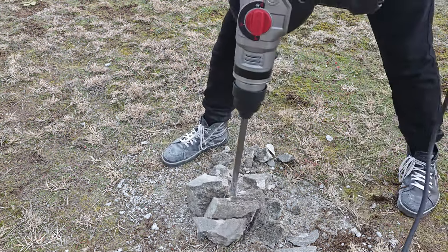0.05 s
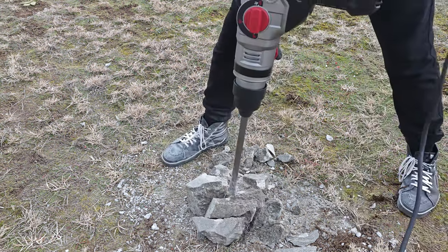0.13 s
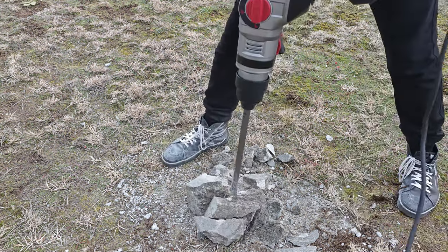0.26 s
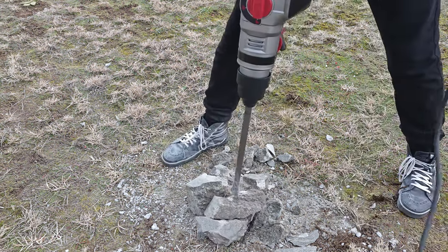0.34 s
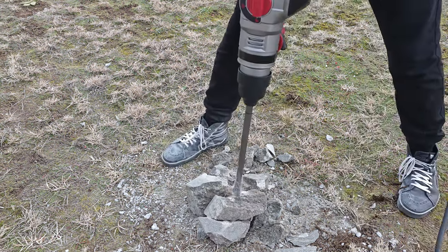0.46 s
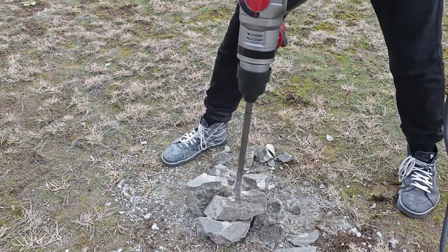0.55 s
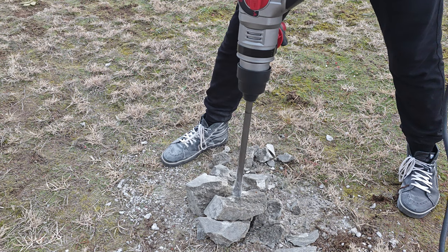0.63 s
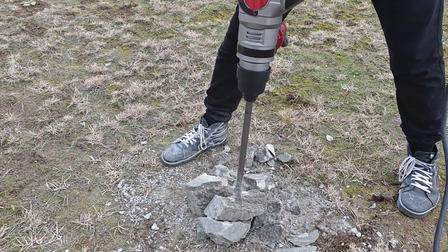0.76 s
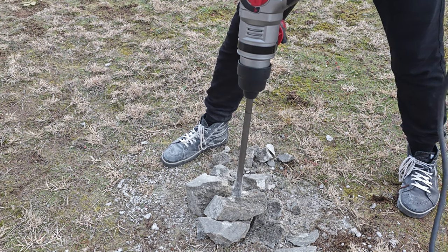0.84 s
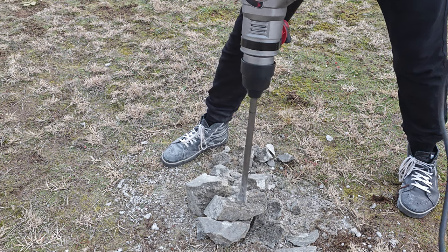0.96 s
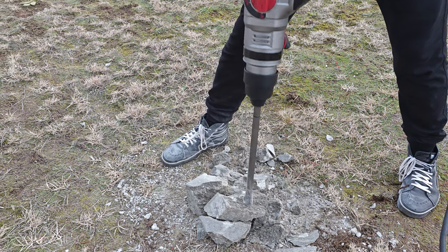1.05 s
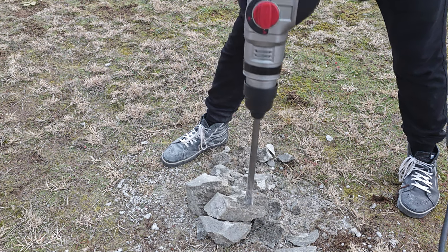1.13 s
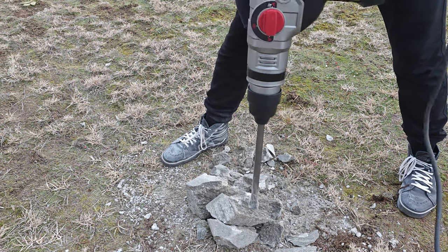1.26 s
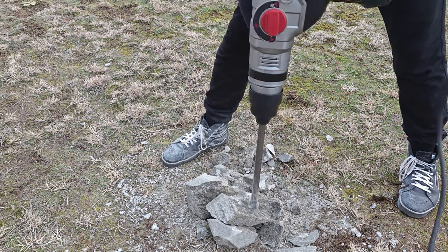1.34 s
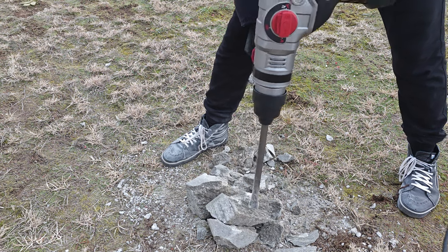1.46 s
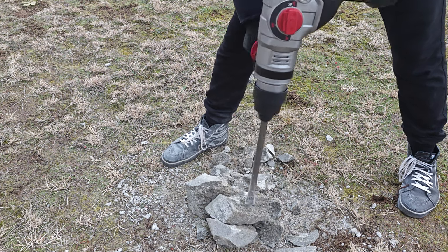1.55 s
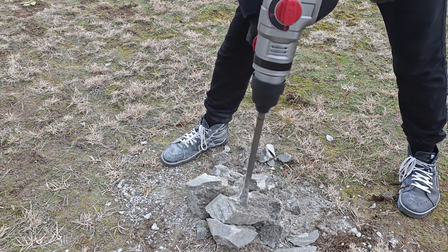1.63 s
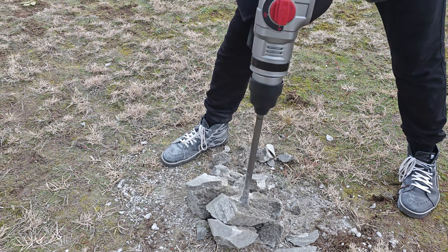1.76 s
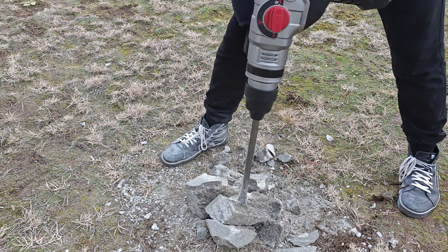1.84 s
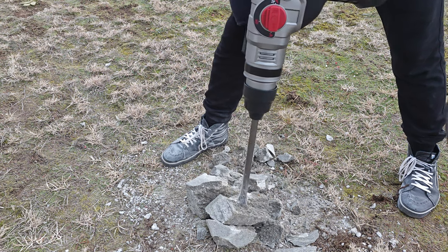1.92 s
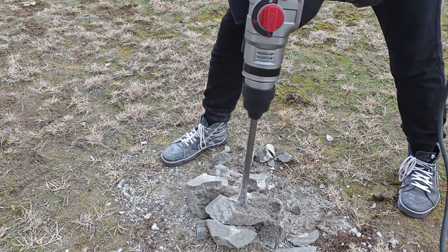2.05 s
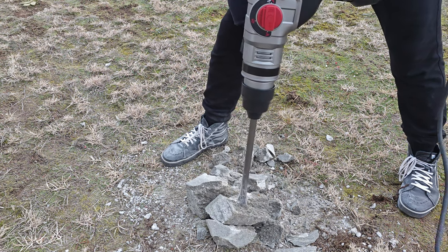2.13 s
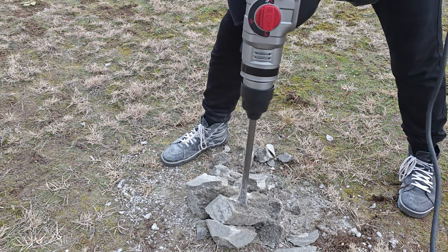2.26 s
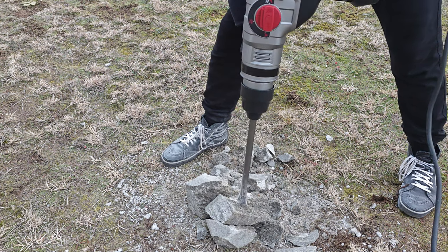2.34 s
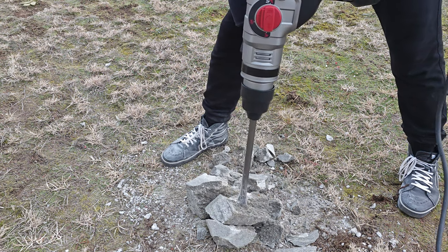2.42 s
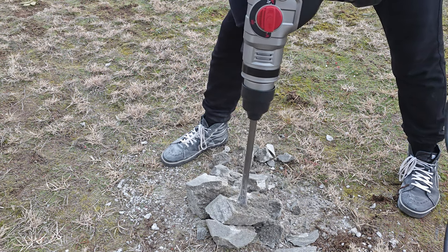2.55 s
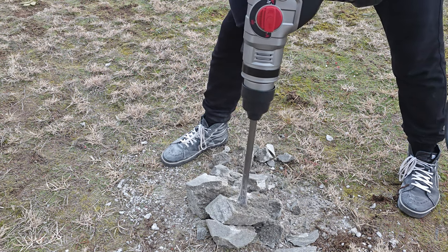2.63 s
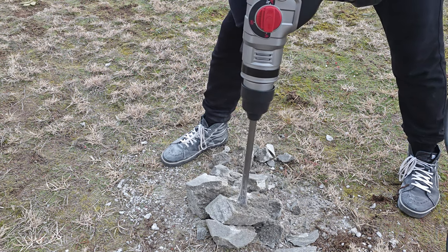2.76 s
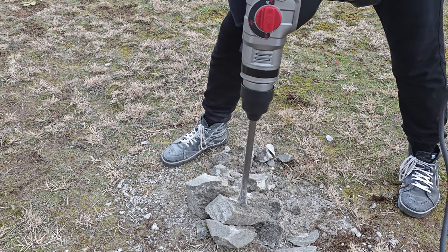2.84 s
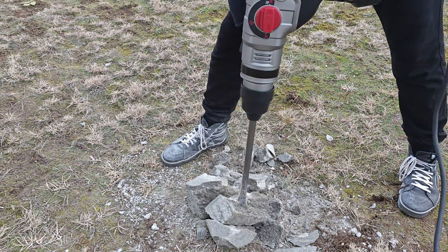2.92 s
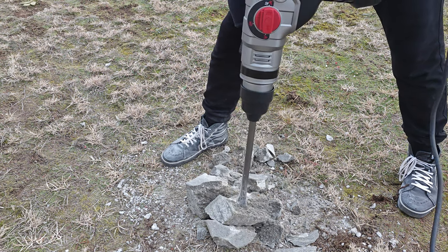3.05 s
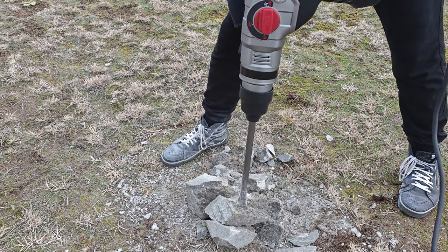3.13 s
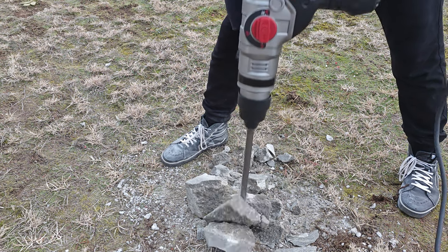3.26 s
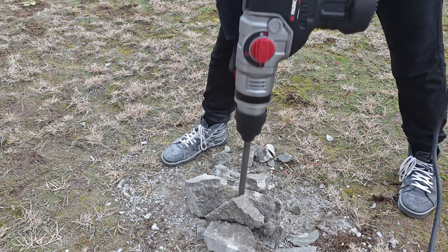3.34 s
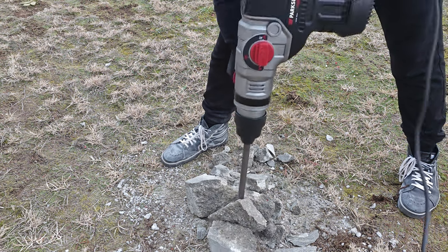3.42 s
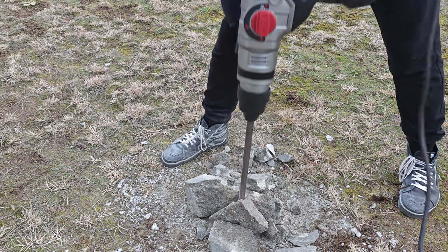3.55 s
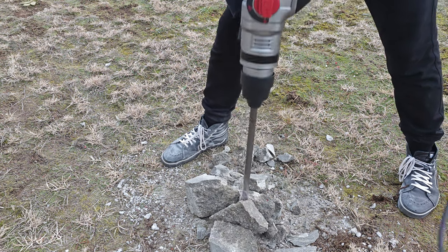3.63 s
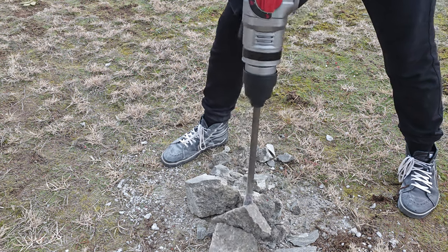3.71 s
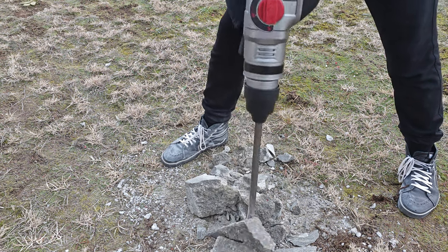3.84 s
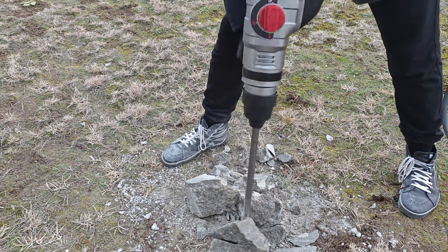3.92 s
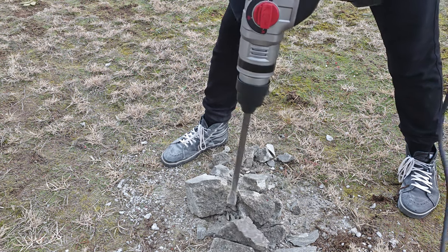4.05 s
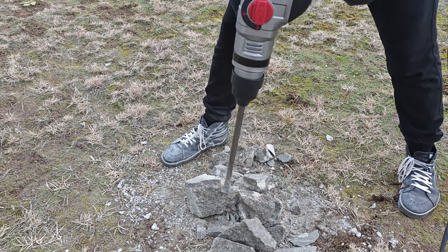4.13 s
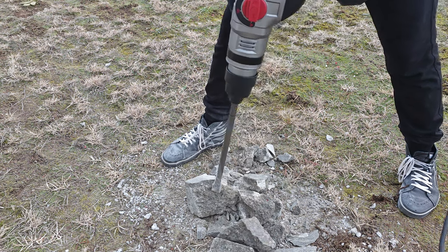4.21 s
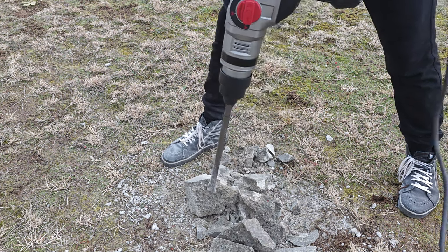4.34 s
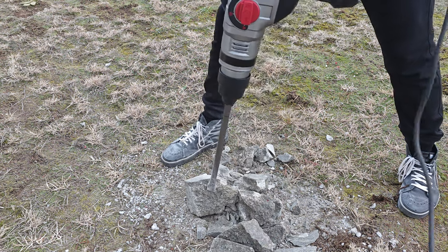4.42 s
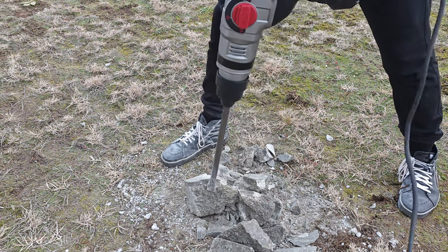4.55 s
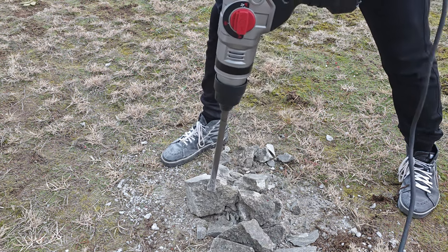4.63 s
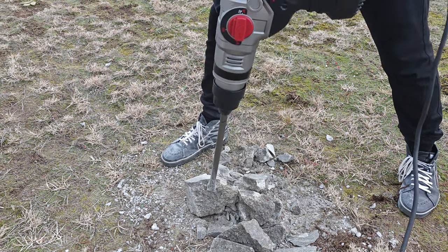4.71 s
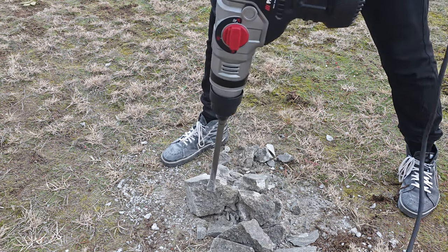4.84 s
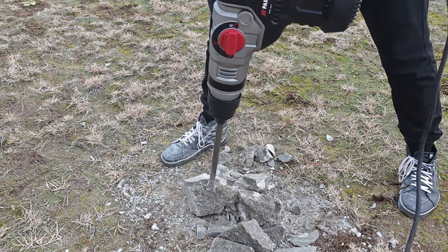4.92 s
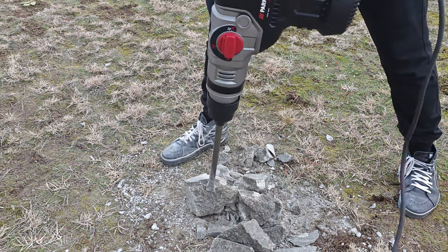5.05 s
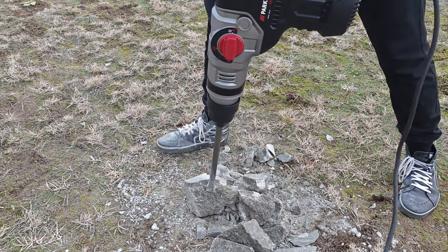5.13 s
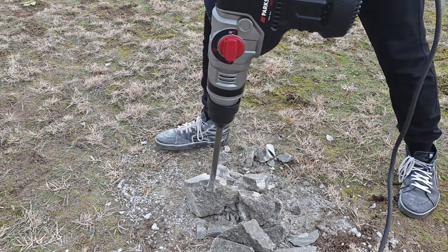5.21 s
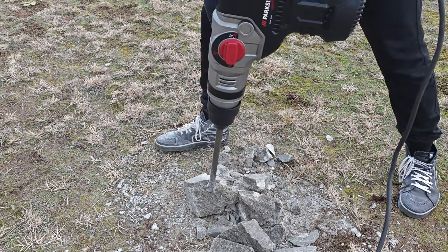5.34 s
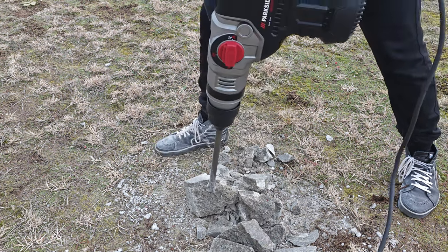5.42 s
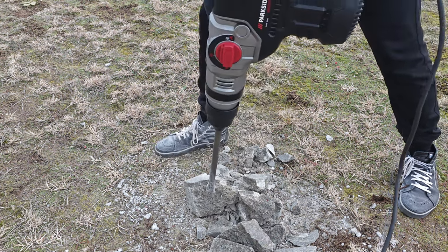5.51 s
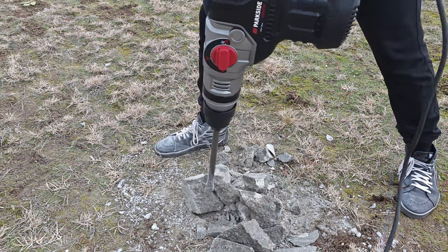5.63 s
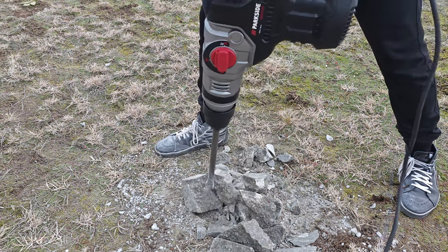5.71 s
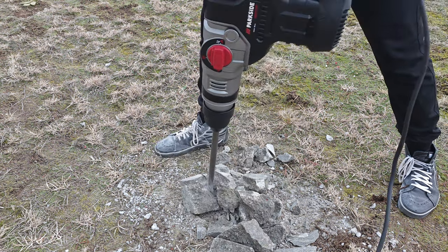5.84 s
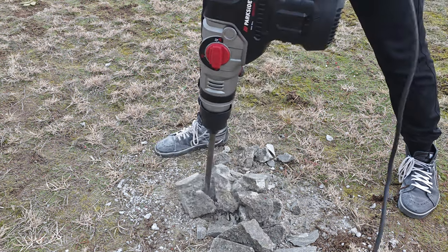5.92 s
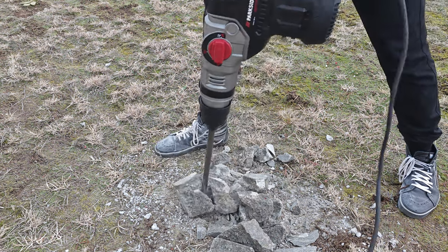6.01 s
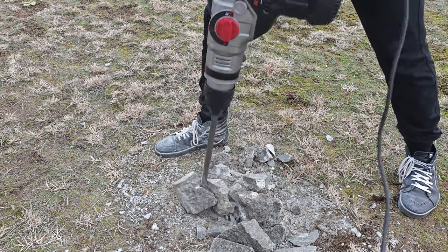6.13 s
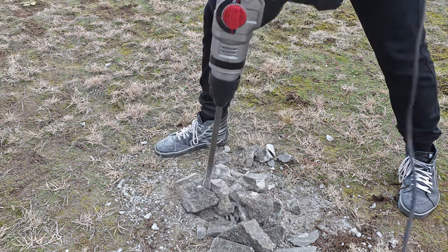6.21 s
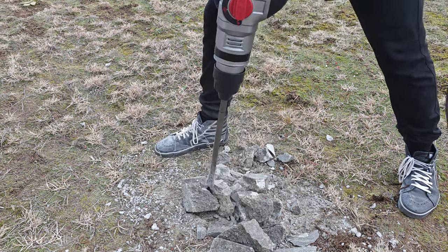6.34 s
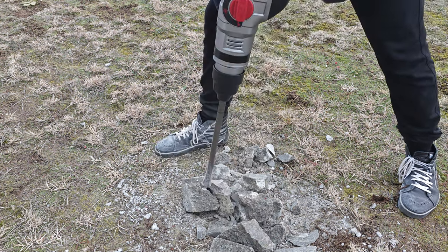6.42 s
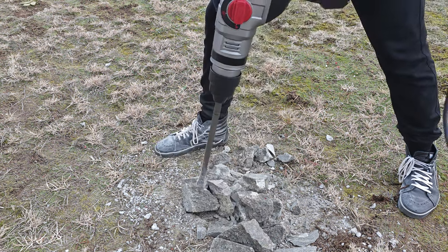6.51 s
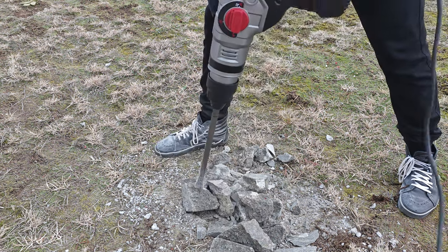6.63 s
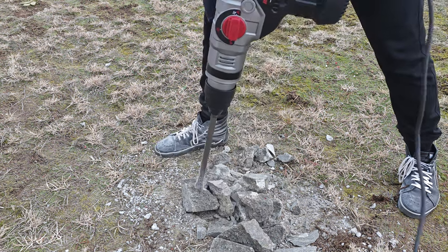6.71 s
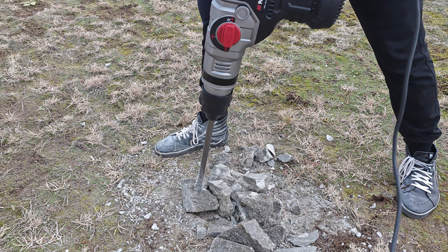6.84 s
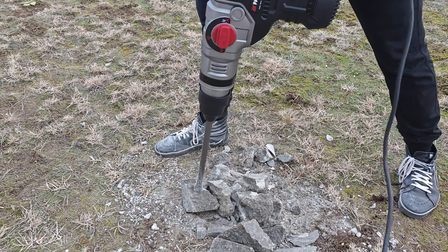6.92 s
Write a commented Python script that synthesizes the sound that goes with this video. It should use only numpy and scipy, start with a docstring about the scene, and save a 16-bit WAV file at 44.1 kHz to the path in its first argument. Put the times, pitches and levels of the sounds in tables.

```python
"""Broken concrete and a steel chisel knock together over light wind; then a hammer drill winds up twice.
Each knock is a damped resonance of stone, and the jogged chisel rings in its own modes.
The motor's rattle, hiss and tones all follow one shaft speed. In two runs of blows the striker
hits the bit and the steel rings; after each run the motor whirrs free.
Low microphone thumps, each mostly on one side, come during and just after the hammering."""
import sys
import numpy as np
from scipy import signal
from scipy.fft import rfft, irfft
from scipy.io import wavfile
from scipy.ndimage import uniform_filter1d

SR = 44100
rng = np.random.default_rng(int(sys.argv[2]) if len(sys.argv) > 2 else 0)


def file_out(sig):
    """Save sig as 16-bit WAV at sys.argv[1]."""
    # one column per channel
    cols = np.atleast_2d(sig).T
    # limit, then scale
    lim = np.clip(cols, -1, 1)
    pcm = np.round(lim * 32767).astype(np.int16)
    wavfile.write(sys.argv[1], SR, pcm)


N = 307377
TIME = np.arange(N) / SR
IMPACT_TIME = np.arange(SR // 4) / SR


def gain_of(db):
    """Decibels to amplitude."""
    return 10 ** (np.asarray(db) / 20)


def unit_rms(x):
    """Normalisation to rms 1."""
    return x / np.sqrt(np.mean(x ** 2) + 1e-20)


def at_hz(points, hz):
    """Interpolation of a spectrum on a log-frequency axis."""
    f, value = np.transpose(points)
    return np.interp(np.log(hz + 1), np.log(f + 1), value)


def add(mix, s, sound):
    """Superposition of a stereo sound starting at s seconds."""
    part = mix[:, round(s * SR):][:, :sound.shape[1]]
    part += sound[:, :part.shape[1]]


def wobble(span_s):
    """Random fluctuation of rms 1, smoothed over span_s."""
    size = max(round(span_s * SR), 2)
    return unit_rms(uniform_filter1d(uniform_filter1d(rng.standard_normal(N), size), size))


def resonance(modes, hz):
    """Summed response of resonators (frequency [Hz], bandwidth [Hz], level [dB])."""
    return sum(gain_of(db) / np.sqrt(1 + (2 * (hz - f) / width) ** 2) for f, width, db in modes)


def spectrum(points):
    """Amplitude response of a level table, as a function of frequency."""
    return lambda hz: gain_of(at_hz(points, hz))


# Likeness of drill and rubble at the two microphones: (frequency [Hz], correlation [-1..1])
SOURCE_COHERENCE = [(60, 0.17), (180, 0.92), (550, 1), (1650, 0.77), (4970, 0.019), (15000, 0.05)]

def noise(length, colour, coherence=SOURCE_COHERENCE):
    """Partially coherent stereo noise of rms 1, shaped by colour(hz)."""
    hz = np.fft.rfftfreq(length, 1 / SR)
    left, independent = rfft(rng.standard_normal((2, length)))
    shared = np.clip(at_hz(coherence, hz), -1, 1)
    right = shared * left + np.sqrt(1 - shared ** 2) * independent
    return unit_rms(irfft(colour(hz) * np.array([left, right]), length))


# Wind over distant hush: (frequency [Hz], relative level [dB])
WIND_SPECTRUM = [(12, -54), (20, -9.5), (82, 3.5), (244, -10.5), (535, -15), (1510, -14.5), (4050, -41.5),
                 (7100, -67), (8650, -53.5), (15200, -49), (16500, -72)]
# Its likeness at the two microphones: (frequency [Hz], correlation [-1..1])
WIND_COHERENCE = [(60, 0.97), (380, 0.85), (2380, -0.38), (15000, 0.27)]
# Its balance: (frequency [Hz], left minus right [dB])
WIND_BALANCE = [(60, 0.5), (380, 0.5), (2380, -1), (15000, 3)]

def wind(level_db=-48.5):
    """Turbulence: low broadband noise, amplitude-modulated by light gusts."""
    hush = noise(N, spectrum(WIND_SPECTRUM), WIND_COHERENCE)
    balance_db = at_hz(WIND_BALANCE, np.fft.rfftfreq(N, 1 / SR))
    hush = irfft(rfft(hush) * gain_of([balance_db / 2, -balance_db / 2]), N)
    gusts_db = 1.5 * wobble(.03) + .5 * wobble(.3)
    return gain_of(level_db + gusts_db) * hush


# Body of the stone: (frequency [Hz], relative level [dB])
STONE_SPECTRUM = [(88, -54.5), (150, -11.5), (652, -1), (985, -0.5), (1370, -8), (1710, -2), (2720, -7.5),
                  (3040, -15.5), (3350, -8.5), (4000, -22), (5200, -62), (8800, -120)]
# Grit at the contact: (frequency [Hz], relative level [dB])
GRIT_SPECTRUM = [(1760, -35), (3000, -4), (4260, -7), (6480, -5.5), (7320, -2.5), (8500, -15.5),
                 (15100, -20.5), (16500, -35)]
# Knocks of bit and rubble: (time [s], relative level [dB], body resonance [Hz], grit re body [dB])
RUBBLE_KNOCKS = [(.012, -21.5, 581, -13), (.034, -15.5, 724, -11.5), (.093, -6, 666, -10),
                 (0.112, -12.5, 616, -26), (0.149, -12.5, 891, 0), (.156, -6, 1650, -21),
                 (.24, -24, 546, -19), (.332, -28.5, 1560, -13.5), (.73, -36, 900, -15.5),
                 (.765, -37.5, 800, -18), (1.013, -16.5, 520, -16), (1.189, -10, 1080, -8.5),
                 (1.216, -15, 1390, -18), (1.308, -10, 750, 1), (1.317, -1.5, 1780, -11),
                 (1.38, -22.5, 706, -18), (1.546, -28, 1230, -21), (1.638, -24, 1220, -21),
                 (1.659, -23, 501, -19), (1.74, -17, 930, -10), (1.772, -15, 900, -20),
                 (1.995, -5, 860, -7.5), (2.226, -40.5, 603, 10.5), (2.909, -25, 970, -33),
                 (5.141, -4, 1810, -18), (5.175, -8, 1960, -20), (5.302, -9, 890, -19),
                 (5.458, -26, 877, 5)]

def knocks(t60_s=0.047):
    """Impact excitation: stone answers with a gritty burst around a heavily damped resonance."""
    out, t = np.zeros((2, N)), IMPACT_TIME
    fall_db = -60 * t / t60_s
    scatter = 0.059 * gain_of(-60 * t / 0.25)  # off the rubble and ground
    for s, db, body_hz, grit_db in RUBBLE_KNOCKS:
        stone = lambda hz: spectrum(STONE_SPECTRUM)(hz) * (1 + 2.54 * resonance([(body_hz, 180, 0)], hz))
        body = noise(len(t), stone) * (gain_of(fall_db) + scatter) * np.minimum(t / 0.0018, 1)
        grit = noise(len(t), spectrum(GRIT_SPECTRUM)) * (gain_of(1.48 * fall_db) + scatter)
        add(out, s, gain_of(db - 9) * (body + gain_of(grit_db) * grit) * np.minimum(t / 0.00089, 1))
    return out


def crumbs(per_second=16, level_db=-73):
    """A Poisson process: crumbs tick faintly, each a decaying burst of grit."""
    ticks = gain_of(12 * rng.random(N)) * (rng.random(N) < per_second / SR)
    envelope = signal.oaconvolve(ticks, gain_of(-60 * IMPACT_TIME / 0.095))[:N]
    return gain_of(level_db) * noise(N, spectrum(GRIT_SPECTRUM)) * envelope


# Chisel modes, the main pair first: (frequency [Hz], level struck end-on [dB], level jogged [dB])
CHISEL_MODES = [(6780, 0, 0), (7040, 0, -14), (3000, -30, -11), (4700, -26, -18), (9200, -25, -16),
                (9960, -23, -24), (11800, -25, -18), (13870, -5, -26), (15600, -25, -26)]

def steel(t, modes_db):
    """Normal modes of a bar, fluttering in level as the bit chatters in the chuck."""
    hz = np.transpose(CHISEL_MODES)[0]
    phase = 2 * np.pi * (hz[:, None] * t + rng.random((2, len(hz), 1)))
    flutter = unit_rms(uniform_filter1d(rng.standard_normal((len(hz), len(t))), size=30))
    return (gain_of(modes_db[:, None] + 3.4 * flutter) * np.sin(phase)).sum(1)


# Sideways jolts of the loose bit: (time [s], level [dB])
BIT_JOGS = [(.093, -34), (1.738, -35), (1.772, -40)]

def jogs(t60_s=0.16):
    """Free vibration: the jogged bit rings and decays exponentially."""
    out, t = np.zeros((2, N)), IMPACT_TIME
    sideways_db = np.transpose(CHISEL_MODES)[2]
    for s, db in BIT_JOGS:
        add(out, s, gain_of(db - 60 * t / t60_s) * steel(t, sideways_db) * np.minimum(t / 0.00067, 1))
    return out


START_S = 2.545
TAKE_UP_S = [START_S, START_S + 0.35]  # the gears take up their slack
# Bands of the windings: (frequency [Hz], bandwidth [Hz], relative level [dB])
WINDING_BANDS = [(647, 250, 6), (2130, 140, 1)]

def growl(length_s=0.28, level_db=-49):
    """Forced vibration: the windings growl in two narrow bands at switch-on."""
    out, t = np.zeros((2, N)), np.arange(round(length_s * SR)) / SR
    onset = np.minimum(t / 0.008, 1) * (1 + 0.96 * np.exp(-t / 0.0071))
    fade = np.minimum((length_s - t) / .1, 1)
    bands = noise(len(t), lambda hz: resonance(WINDING_BANDS, hz) ** 2)
    add(out, START_S, gain_of(level_db) * onset * fade * bands)
    return out


# Housing resonances: (frequency [Hz], bandwidth [Hz], relative level [dB])
HOUSING_MODES = [(515, 31, -30), (949, 51, -6), (1593, 10, -23), (1902, 16, -4), (2198, 65, -10),
                 (2630, 64, -6.5), (3220, 22, 0.5)]
# Tooth rattle: (frequency [Hz], relative level [dB])
RATTLE_SPECTRUM = [(88, -72), (150, -31.5), (362, -8), (477, -7.5), (986, -5.5), (1360, -9), (1540, -3.5),
                   (4270, -19.5), (6000, -27), (7800, -26), (13200, -120)]
# Tones of the drive: gear mesh orders, and the commutator at order 12.9: (order [multiple of shaft speed],
# relative level [dB])
DRIVE_ORDERS = [(2, -14), (3.22, -5), (6.44, -4), (12.9, -6)]

def gears(speed, turns):
    """Source and filter: tooth rattle, mesh tones and a commutator tone excite the resonances of the housing."""
    # the piston squeezes its air cushion just before each blow, and the gears go slack after it
    load = sum(np.exp(-((TIME - s + .012) / .007) ** 2) - .6 * np.exp(-((TIME - s - .022) / .012) ** 2)
               for s, *_ in STRIKER_BLOWS)
    housing = lambda hz: spectrum(RATTLE_SPECTRUM)(hz) * (1 + 2.66 * resonance(HOUSING_MODES, hz))
    out = noise(N, housing) * gain_of(3.45 * load)
    bass = signal.sosfiltfilt(signal.butter(2, 520, fs=SR, output="sos"), out)
    out += (speed / 260 - 1) * bass  # the low end builds up with speed
    lead_db = np.interp(TIME, TAKE_UP_S, [20, 0])  # at first the tones lead the rattle
    for order, db in DRIVE_ORDERS:
        tone = np.sin(2 * np.pi * order * turns + 1.43 * wobble(0.0073))
        swell = housing(order * speed) * (.5 + resonance(HOUSING_MODES, order * speed))
        out += gain_of(db + lead_db + 9 * load + 3 * wobble(.02)) * swell * tone
    return out


TOP_SPEED = 378  # rev/s
# Fan noise: (frequency [Hz], relative level [dB])
FAN_SPECTRUM = [(2060, -13), (3500, 7), (4280, 0.5), (7010, 5), (8850, -10), (9820, -4.5), (15200, -14),
                (16200, -9), (16500, -59)]
# Commutator tones: (order [multiple of shaft speed], relative level [dB])
COMMUTATOR_ORDERS = [(26, -13), (39, -21)]

def fan_and_commutator(speed, turns):
    """Turbulent flow hisses; periodic contact with the commutator bars whines at shaft harmonics."""
    out = noise(N, spectrum(FAN_SPECTRUM))
    for order, db in COMMUTATOR_ORDERS:
        tone = np.sin(2 * np.pi * order * turns + 0.4 * wobble(0.003))
        sweep_db = 50 * np.log10(speed / TOP_SPEED) + .5 * at_hz(FAN_SPECTRUM, order * speed)
        out += gain_of(db + sweep_db + 4 * wobble(.015)) * tone
    return out


def shaft_hum(speed, turns):
    """Rotating unbalance: one cycle a turn, growing steeply with speed."""
    hum_db = -22.5 + 150 * np.log10(speed / TOP_SPEED) + wobble(.015)
    return gain_of(hum_db) * np.sin(2 * np.pi * turns)


# Armature rotation: (time [s], speed [rev/s])
SHAFT_SPEED = [(2.5, 12), (2.77, 88), (3.0, 118), (3.17, 175), (3.45, 235), (3.6, 277), (3.78, 330),
               (4.0, 273), (4.5, 169), (5.0, 97), (5.33, 73), (5.84, 196), (6.2, 296), (6.4, 342),
               (6.55, 372), (6.62, 378), (6.85, 305), (6.97, 275)]
# Runs of blows: (start [s], end [s], rattle dip at the end [dB], first chisel mode re second [dB])
HAMMER_RUNS = [(3.034, 3.436, -12, -10.5), (5.377, 6.093, -8.5, -13.5)]

def motor(reference_speed=330, recovery_s=0.17):
    """Power laws tie rattle and hiss to shaft speed; both dip during each run of blows, then recover."""
    speed = np.interp(TIME, *np.transpose(SHAFT_SPEED))
    turns = np.cumsum(speed) / SR
    speed_db = 20 * np.log10(speed / reference_speed)
    # the layshaft and the crank load the teeth unevenly; loose teeth chatter at random
    beat_db = 1.77 * np.cos(2 * np.pi * turns / 4.6) + 0.5 * np.cos(2 * np.pi * turns / 12.3)
    beat_db += 0.46 * wobble(0.0012)
    dip_db = np.interp(TIME, TAKE_UP_S, [-36.5, 0])  # a soft start
    for start, end, db, _ in HAMMER_RUNS:
        dip_db += np.interp(TIME, [start, end, end + recovery_s], [0, db, 0])
    rattle_db = -18 + 0.85 * speed_db + dip_db + beat_db
    hiss_db = -25.5 + 2.04 * speed_db + 0.68 * dip_db + beat_db
    rattle = gears(speed, turns) * gain_of(rattle_db)
    hiss = fan_and_commutator(speed, turns) * gain_of(hiss_db)
    out = shaft_hum(speed, turns) + hiss + rattle * gain_of(0.45 * wobble(0.023))
    return out * np.clip((TIME - START_S) / 0.018, 0, 1)


# Crack of a blow: (frequency [Hz], relative level [dB])
CRACK_SPECTRUM = [(180, -0.5), (300, -2.5), (1720, 5), (3470, 2), (4310, -7.5), (4850, 4.5), (7260, -2),
                  (9020, -9.5), (14200, -9), (16500, -8)]
# Blows: (time [s], crack level [dB], ring level [dB], free ringing [s], gain of modes above 8 kHz [dB])
STRIKER_BLOWS = [(2.947, 3, -20, 0.0064, 8), (3.053, -1, -17, 0.0071, 11), (3.134, -3.5, -8.5, 0.0086, 4),
                 (3.203, -6, -10, 0.0075, 7), (3.264, -2, -8.5, 0.0081, 5), (3.320, -0.5, -9, 0.014, 4),
                 (3.371, -7, -12, 0.045, 8), (3.420, -8, -8.5, 0.076, 0), (3.469, -0.5, -9, 0.01, 0),
                 (3.515, -3, -23, 0.016, 4), (3.653, 0.5, -27, .005, -20), (5.244, -3.5, -28, 0.0068, -7),
                 (5.413, -5.5, -22, 0.0068, -18), (5.526, -2, -13.5, 0.0045, -14),
                 (5.614, -3, -18, 0.0048, 4), (5.688, -1.5, -18, 0.016, 2), (5.754, 2, -14.5, 0.051, 6),
                 (5.811, -1, -16, 0.013, 7.5), (5.866, -8, -18, 0.043, 9), (5.917, -5, -17, 0.042, 10),
                 (5.965, -5, -8.5, 0.058, 3.5), (6.012, -2, -13, 0.043, 4), (6.059, -4, -10.5, 0.0084, 5),
                 (6.068, -27, -21, 0.079, 1), (6.926, -2, -23, 0.0063, -20), (6.962, -1, -15, .012, 11)]

def blows(bounce_s=.009, rebound_s=.023, left_bias_db=2.1):
    """Impact and contact damping: a crack, steel ringing until the stone damps it, and a rebound tick."""
    out, t = np.zeros((2, N)), IMPACT_TIME
    hz, struck_db, _ = np.array(CHISEL_MODES, float).T
    pan = gain_of([[left_bias_db / 2], [-left_bias_db / 2]])
    rebound = (t > rebound_s) * np.exp(-(t - rebound_s) / 0.036)
    for s, crack_db, ring_db, free_s, high_db in STRIKER_BLOWS:
        free = 1 / (1 + np.exp(np.clip((t - free_s) / 0.00061, -50, 50)))  # 1 ringing, 0 damped
        envelope = gain_of(-60 * t / .004) + .2 * gain_of(-60 * t / .03)
        envelope += .4 * (t > bounce_s) * gain_of(-60 * abs(t - bounce_s) / .006)  # the striker bounces
        envelope += 0.1 * np.maximum(free, t < .01) * gain_of(-60 * t / 0.04)
        envelope += 0.035 * (t > rebound_s) * gain_of(-60 * abs(t - rebound_s) / 0.022)
        crack = envelope * noise(len(t), spectrum(CRACK_SPECTRUM))
        crack *= gain_of(crack_db) / abs(crack).max()
        pair_db = min(HAMMER_RUNS, key=lambda run: abs(run[1] - s))[-1]  # from the nearest run
        modes_db = struck_db + high_db * (hz > 8000)
        modes_db[:2] += [pair_db / 2, -pair_db / 2]
        damped_db = (-24 + 11 * rebound) * (1 - free) - 60 * np.maximum(t - free_s, 0) / 0.96
        ring = gain_of(ring_db - 7.5 - 60 * t / 0.25 + damped_db) * steel(t, modes_db)
        add(out, s, (crack + ring) * np.minimum(t / 0.00038, 1) * pan)
    return out


# Low microphone thumps: (time [s], level [dB], side [0 left, 1 right])
MICROPHONE_THUMPS = [(3.133, -9, 1), (3.203, -10, 1), (3.261, -9, 0.92), (3.321, -9.5, 0.95),
                     (3.372, -5, 0.79), (3.422, -5.5, 0.87), (3.589, -6.5, 0.81), (5.692, -16.5, 0.79),
                     (5.758, -14.5, 0.77), (5.866, -10, 0.041), (6.012, -5.5, 0.79), (6.068, -6.5, 0.79),
                     (6.171, -11, 0.048), (6.192, -14, 0)]

def thumps(drop_s=0.0031, spill_db=-17):
    """Transient response: the capsule kicks up, drops, and its bias relaxes slowly."""
    out, t = np.zeros((2, N)), np.arange(SR // 2) / SR
    kick = np.exp(-((t - .0012) / 0.00038) ** 2)
    progress = np.maximum(t - .002, 0) / drop_s
    drop = 3.9 * progress * np.exp(-2 * progress)
    bias = 0.22 * np.minimum(progress, 1) * np.exp(-t / 0.037)
    for s, db, side in MICROPHONE_THUMPS:
        add(out, s, gain_of(db + spill_db * np.array([[side], [1 - side]])) * (kick - drop - bias))
    return signal.sosfilt(signal.butter(1, .4, "high", fs=SR, output="sos"), out)


def scene():
    """Linear superposition of all sources at the microphones."""
    return motor() + blows() + knocks() + jogs() + crumbs() + wind() + thumps() + growl()


def record(dry):
    """Soft saturation rounds off the highest peaks; a low-pass filter limits the band."""
    ceiling, edge_hz = .9, 16000
    limited = ceiling * np.tanh(dry / ceiling)
    lowpass = signal.firwin(255, edge_hz, window=("kaiser", 8), fs=SR)
    return signal.oaconvolve(limited, lowpass[None], "same")


dry = scene()
out = record(dry)
file_out(out)
```